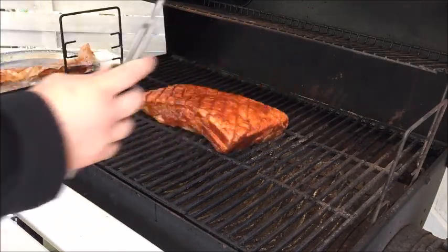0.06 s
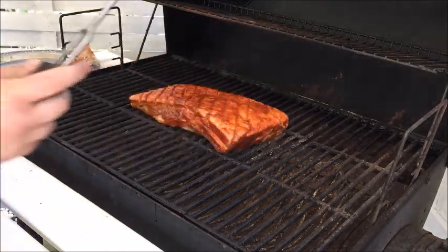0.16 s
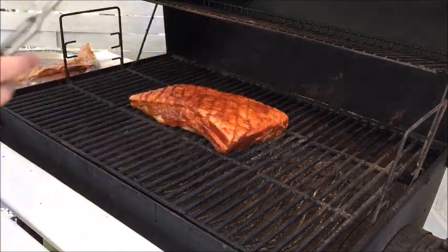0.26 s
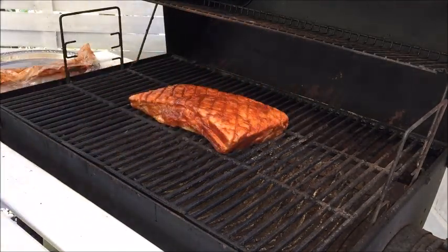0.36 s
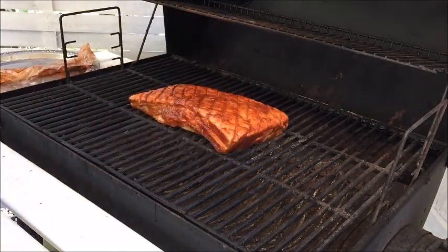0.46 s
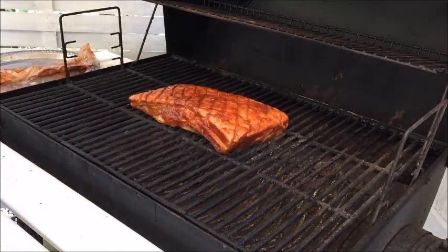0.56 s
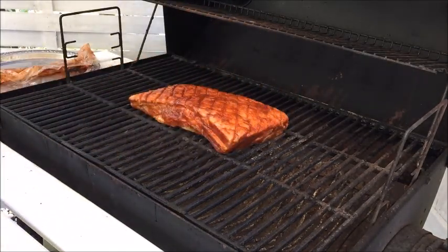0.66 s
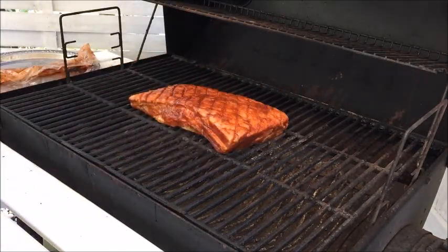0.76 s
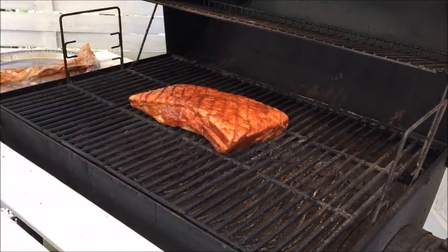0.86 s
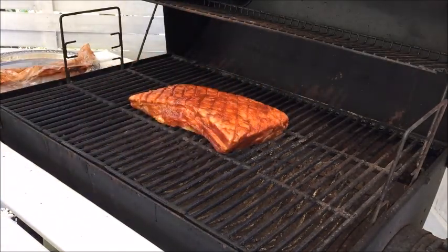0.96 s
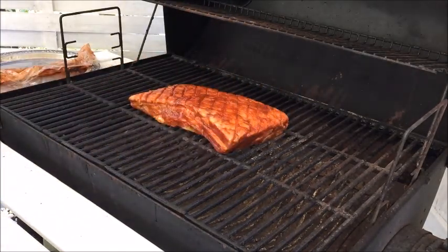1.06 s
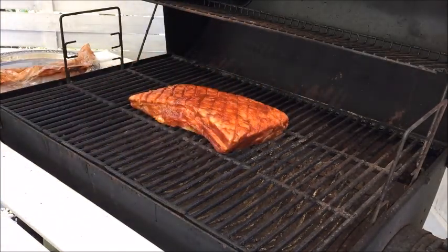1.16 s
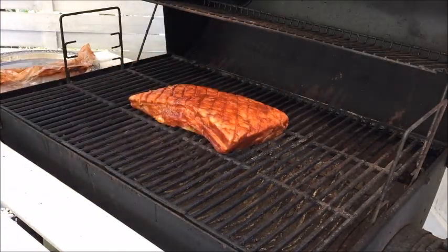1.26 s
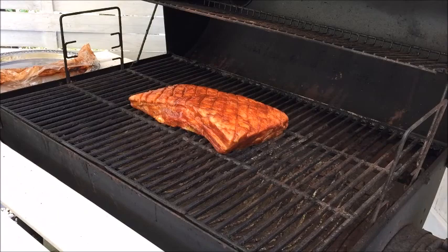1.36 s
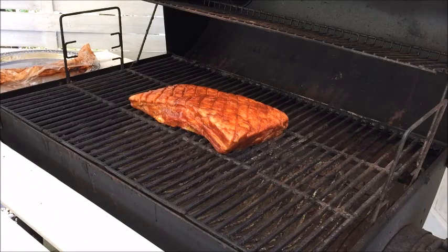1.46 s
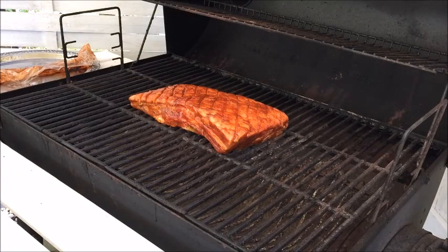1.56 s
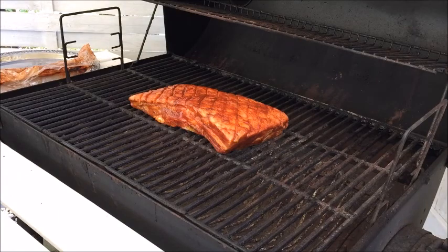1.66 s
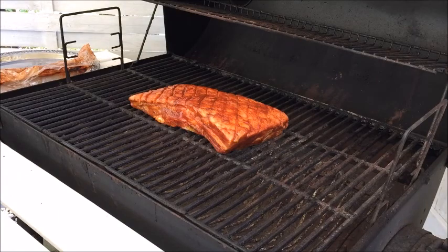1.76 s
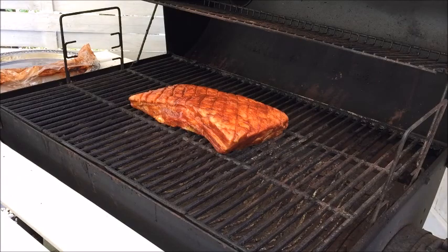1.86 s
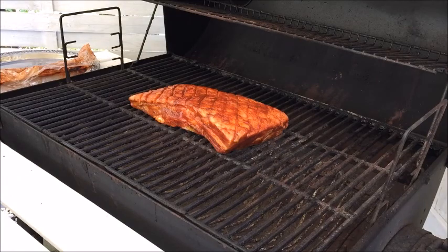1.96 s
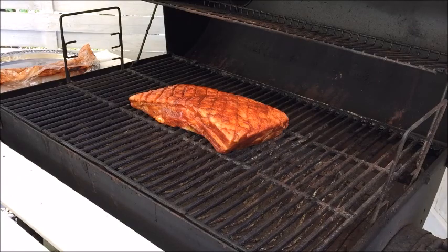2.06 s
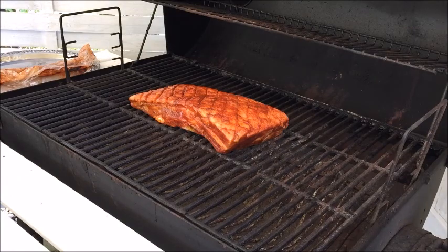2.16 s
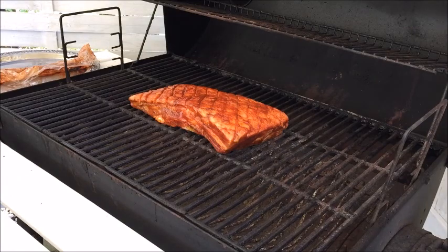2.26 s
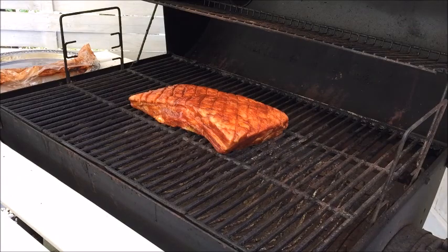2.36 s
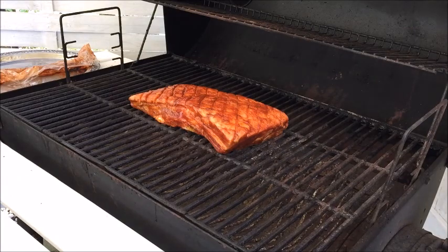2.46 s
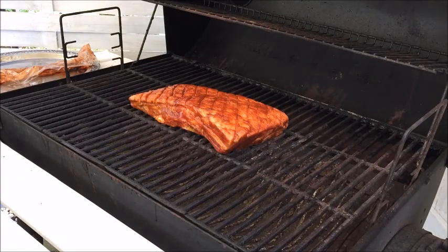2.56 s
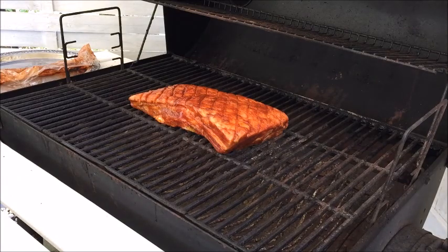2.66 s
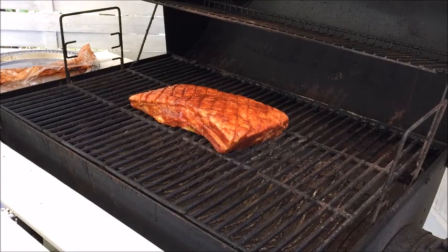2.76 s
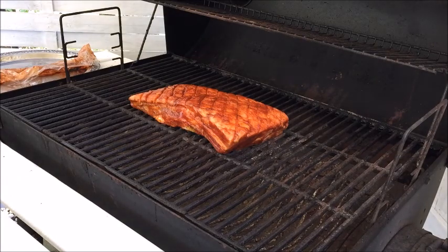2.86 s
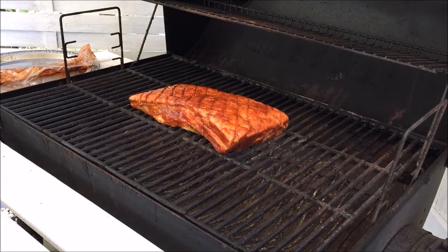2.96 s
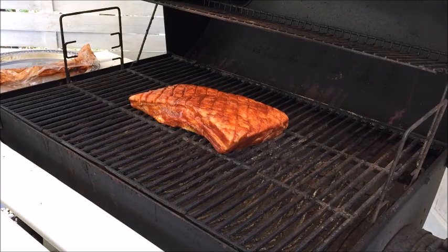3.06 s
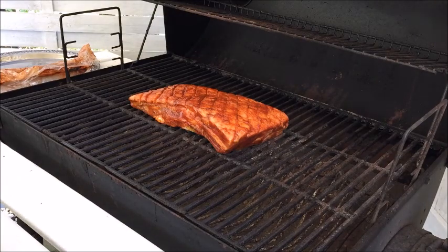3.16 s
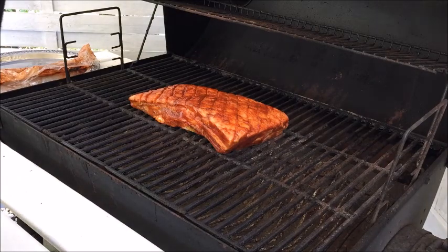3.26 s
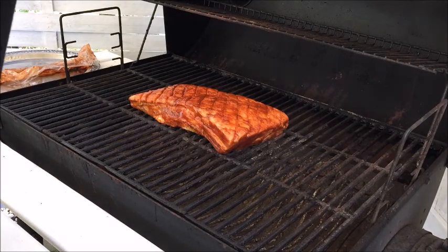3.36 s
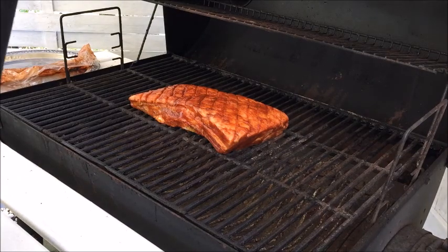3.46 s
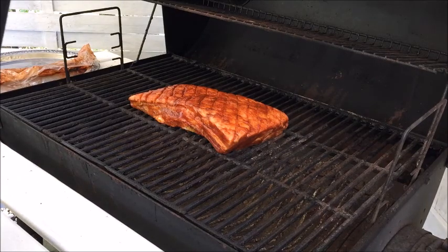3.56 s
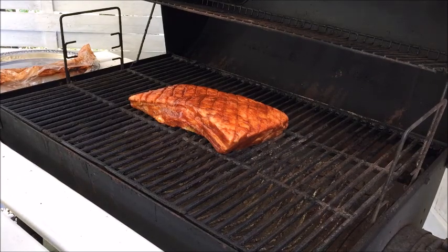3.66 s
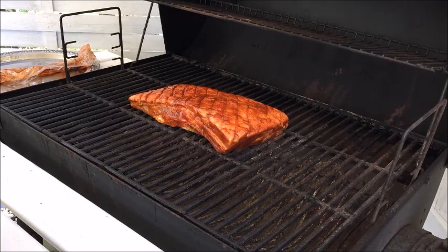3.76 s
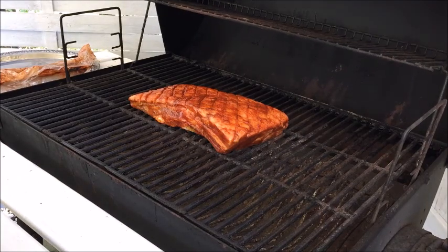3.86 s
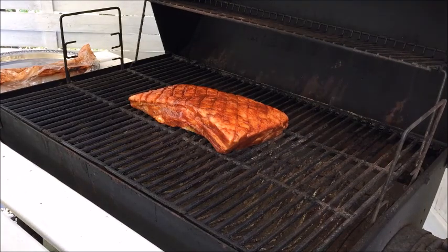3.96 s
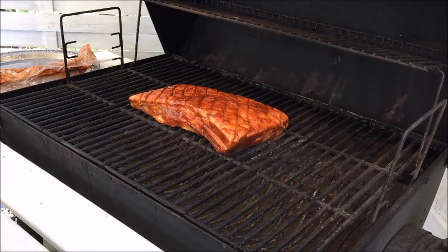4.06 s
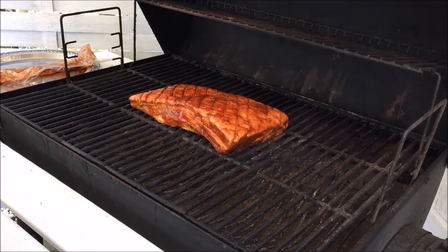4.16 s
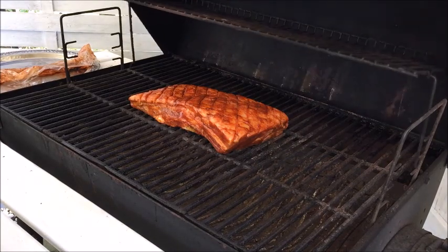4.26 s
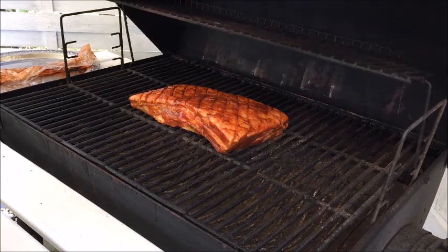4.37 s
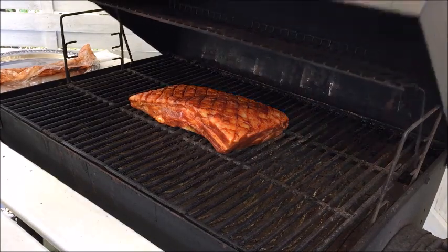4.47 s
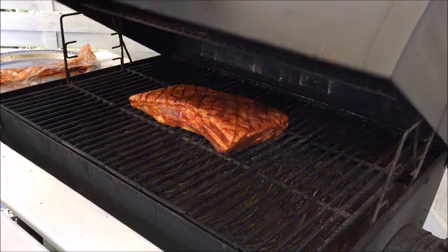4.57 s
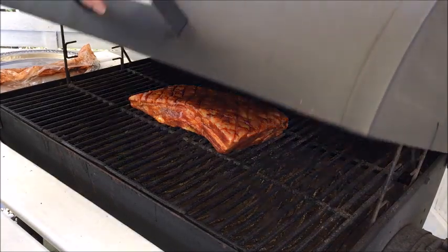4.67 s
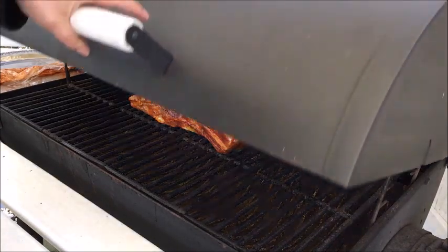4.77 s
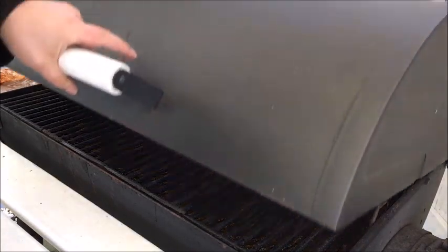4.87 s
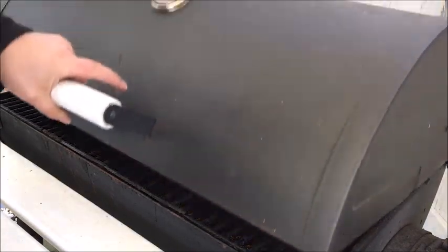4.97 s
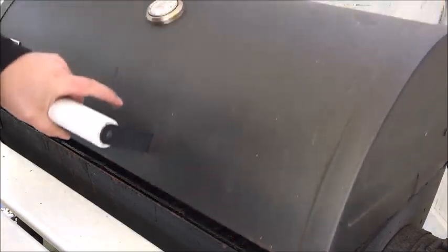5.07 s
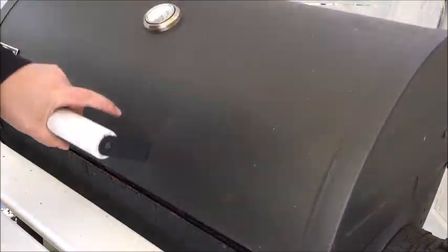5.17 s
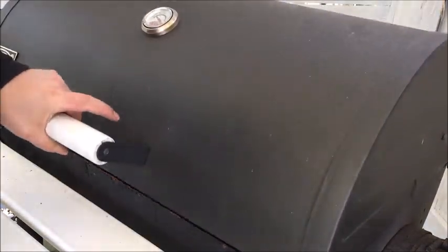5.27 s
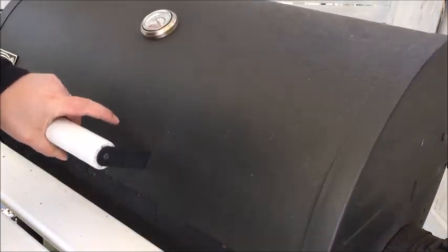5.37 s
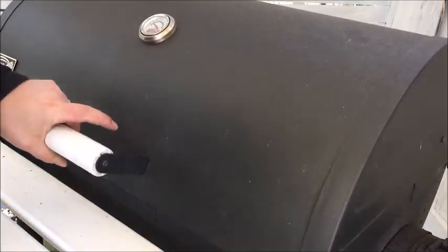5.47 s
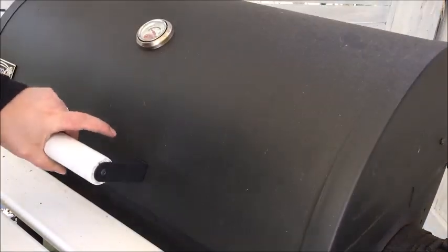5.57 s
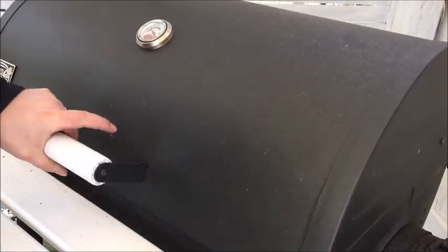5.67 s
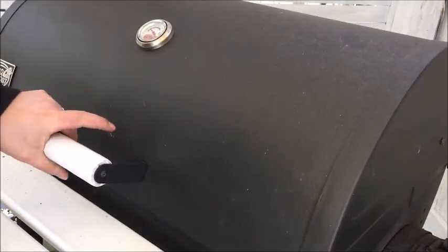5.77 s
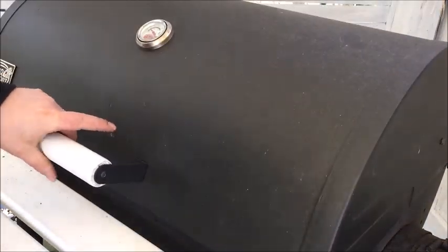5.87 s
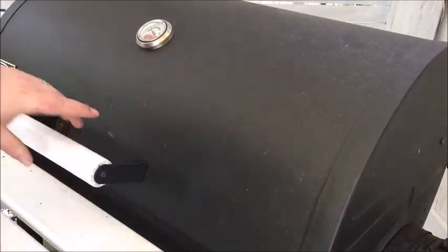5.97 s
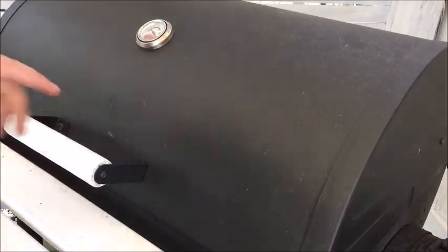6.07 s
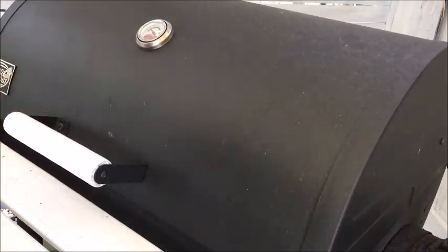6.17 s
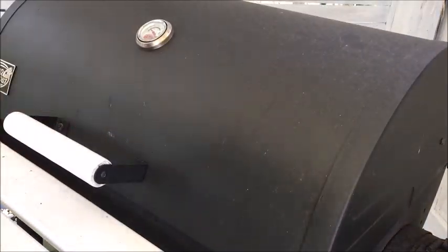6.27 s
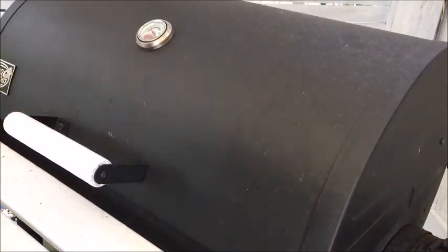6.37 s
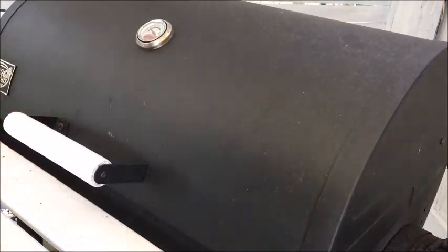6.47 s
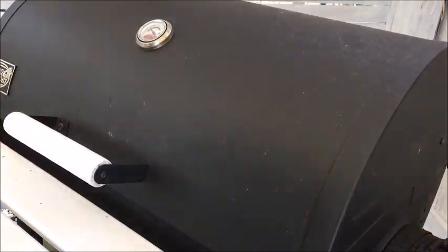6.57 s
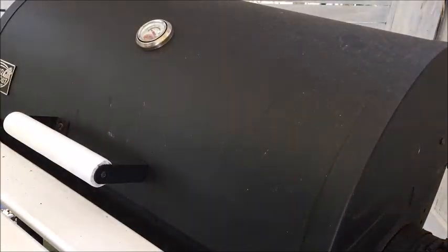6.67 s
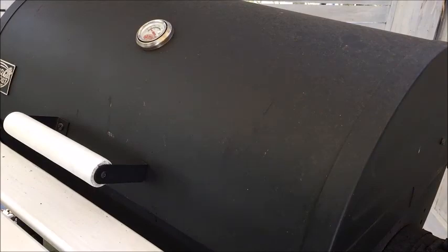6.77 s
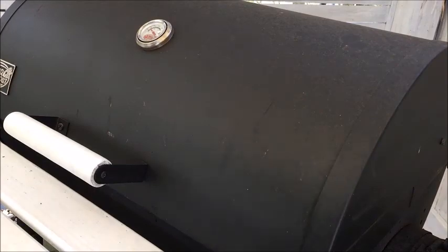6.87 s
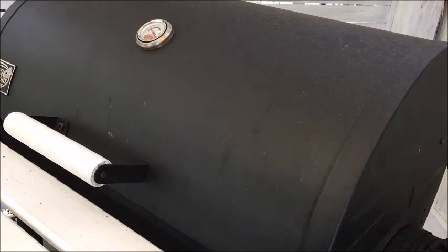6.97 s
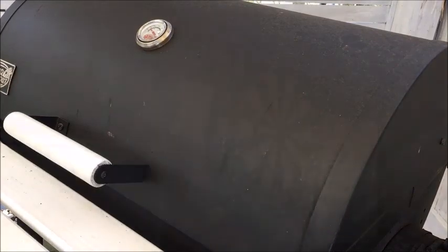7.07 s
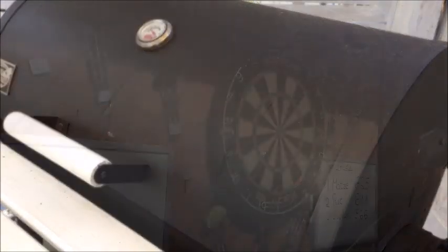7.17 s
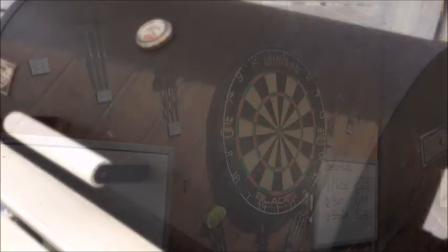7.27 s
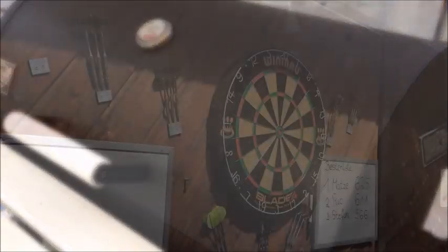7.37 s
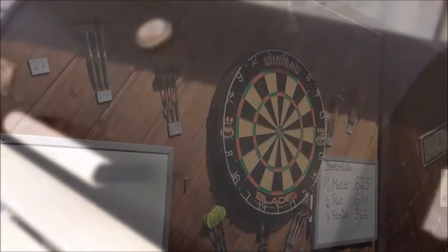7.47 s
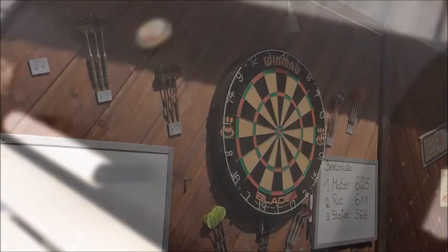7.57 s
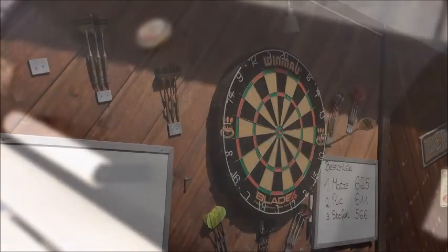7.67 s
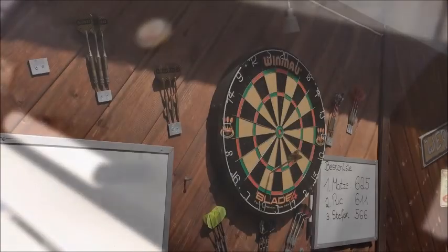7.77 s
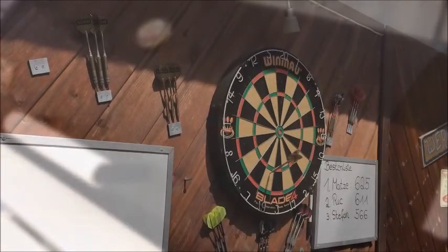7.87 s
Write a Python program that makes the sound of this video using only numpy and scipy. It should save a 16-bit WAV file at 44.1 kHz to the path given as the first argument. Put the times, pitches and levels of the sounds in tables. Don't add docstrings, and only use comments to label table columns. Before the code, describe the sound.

A quiet yard heard on a phone close to a smoker: soft air noise, low lumpy traffic and a wavering fan drone run throughout. Thin sliding bird whistles come near 0.4, 2.5, 4.6 and 7 seconds, with a second two-note bird and short far whistles between. Until about 3 seconds, soft low steps shuffle on decking and tongs tick lightly, with a sharper click at 2.2. Around 3.7 a scuff and a brief ringing clink. From 4.2 the steel lid grinds down on its hinge, groaning and squealing in uneven slips, hardest near 4.9, easing by 5.4. At 5.74 it slams: by far the loudest event, a rapid cluster of heavy thumps, rim cracks and hollow barrel ringing. Bounces and pings follow from 5.83 to 6.5, over a fading hum. Faint touches remain, then low thuds and a click from 7.65 until the end near 7.9.

```python
import sys
import numpy as np
from scipy import signal
from scipy.fft import rfft, irfft, next_fast_len
from scipy.io import wavfile
from scipy.ndimage import uniform_filter1d

SR = 44100
rng = np.random.default_rng(int(sys.argv[2]) if len(sys.argv) > 2 else 0)


def wav_record(signal):
    frames = np.transpose(np.atleast_2d(signal))
    bounded = np.clip(frames, -1, 1)
    quanta = np.round(bounded * 32767).astype(np.int16)
    wavfile.write(sys.argv[1], SR, quanta)


def how_loud(loudness_db):
    steps = np.asarray(loudness_db, float) / 20
    return 10 ** steps


N = 349713


def evened(x):
    return x / np.sqrt(np.mean(x ** 2) + 1e-20)


def read(points, hz):
    f, value = np.transpose(points)
    return np.interp(np.log(hz + 1), np.log(f + 1), value)


def add(mix, s, sound):
    part = mix[round(s * SR):][:len(sound)]
    part += sound[:len(part)]


def seconds(size):
    return np.arange(size) / SR


def decay(t, t60):
    return how_loud(-60 * t / t60)


def shaped(size, gain):
    padded = next_fast_len(size)
    hz = np.fft.rfftfreq(padded, 1 / SR)
    spectrum = rfft(rng.standard_normal(padded)) * gain(hz)
    return evened(irfft(spectrum, padded)[:size])


def bell(hz, centre_hz, octaves):
    return np.exp(-.5 * (np.log2((hz + 1) / centre_hz) / octaves) ** 2)


def slow_noise(size, width):
    return evened(uniform_filter1d(rng.standard_normal(size), width))


def uneven(shape, frames):
    return evened(uniform_filter1d(uniform_filter1d(rng.standard_normal(shape), 3, 0), frames, 1))


def ring(modes, length_s):
    t = seconds(round(length_s * SR))
    return sum(how_loud(db) * decay(t, t60) * np.sin(2 * np.pi * hz * t) for hz, db, t60 in modes)


def fuzzy(hz, fuzz, wobble_s):
    a, b = (slow_noise(len(hz), max(2, round(wobble_s * SR))) for _ in "ab")
    turn = np.exp(2j * np.pi * np.cumsum(hz) / SR)
    return (turn * ((1 - fuzz) * np.sqrt(2) + fuzz * (a + 1j * b))).real


# frequency in Hz, level in dB per Hz.
AIR = [(200, 11), (400, -6.5), (700, 0), (1100, -1), (2000, -4), (3500, -7), (4800, -11), (6500, -12),
       (8500, -14), (10500, -17), (12000, -14.5), (15500, -19.5), (15800, -12.5), (15900, -66.5)]
# time in seconds, level in dB.
RUMBLE = [(0, -64), (1.4, -62.5), (3, -66), (5.4, -61.5), (7.3, -66), (7.93, -56)]
# time in seconds, level in dB.
FAN = [(0, -66.5), (.9, -61), (1.4, -69), (2, -76), (2.45, -65), (3.4, -75), (3.9, -65), (5.5, -70.5),
       (7.93, -72)]


def yard():
    clock = seconds(N)
    rumble_db, fan_db = (np.interp(clock, *np.transpose(c)) for c in (RUMBLE, FAN))
    motor_db = -70.5 + 0.67 * (fan_db - fan_db.mean())
    drift_db = 0.8 * shaped(N, lambda f: 1. * (f < 14))
    out = how_loud(-65.5 + drift_db) * shaped(N, lambda f: how_loud(read(AIR, f)))
    drones = [(rumble_db + 6, 61.6, 0.4, 11.0, 2.4), (fan_db + 2, 210.0, 0.15, 12, 4.25),
              (motor_db, 127, 0.32, 3.7, 3.3), (-78, 302, 0.47, 5.3, 2.5)]
    for db, hz, octaves, lumps_hz, lumps_db in drones:
        lumps = shaped(N, lambda f: 1. * (f < lumps_hz))
        out = out + shaped(N, lambda f: bell(f, hz, octaves)) * how_loud(db + lumps_db * lumps)
    return out


# start in seconds, level in dB, pitch in Hz, t60 in seconds.
STEPS = [(7.649, -31, 52.8, 0.21), (7.783, -33.5, 70, 0.18), (7.902, -25, 89, 0.12)]
# start in seconds, level in dB.
SHUFFLES = [(0.478, -48), (0.83, -38), (1.181, -37), (1.474, -39), (1.977, -39.5), (2.202, -47),
            (3.039, -40.5)]


def steps():
    out, t = np.zeros(N), seconds(12000)
    shuffle_hz, shuffle_t60 = 56, 0.22
    for s, db, hz, t60 in STEPS + [(s, db, shuffle_hz, shuffle_t60) for s, db in SHUFFLES]:
        swell = 1 - np.exp(-t / 0.0044)
        add(out, s, how_loud(db) * decay(t, t60) * swell * np.sin(2 * np.pi * hz * t))
    return out


def whistled(notes):
    out = np.zeros(N)
    for s, length_s, start_hz, end_hz, db in notes:
        size = round(length_s * SR)
        fuzz, wobble_s = (.7, .005) if 3000 < end_hz < 4500 else (.55, .011)
        note = fuzzy(np.linspace(start_hz, end_hz, size), fuzz, wobble_s)
        add(out, s, how_loud(db) * note * signal.windows.tukey(size, .45))
    return out


def echoed(sound):
    echoes = (rng.random(8000) < .03) * rng.standard_normal(8000) * decay(seconds(8000), .2)
    return sound + how_loud(-7) * signal.oaconvolve(sound, echoes / np.linalg.norm(echoes))[:N]


# start in seconds,
# length in seconds, first Hz, last Hz, level in dB.
WHISTLES = [(0.297, 0.057, 4330, 4300, -71), (0.545, 0.042, 3500, 3100, -75),
            (1.96, 0.029, 3300, 3170, -65.5), (2.398, 0.095, 2260, 2200, -58),
            (2.763, 0.037, 3540, 3050, -69), (3.54, 0.12, 2250, 2500, -69), (4.75, 0.065, 2110, 2220, -66),
            (4.82, 0.059, 2240, 2230, -61.5), (6.26, 0.073, 2620, 2150, -64.5),
            (7.268, 0.18, 1870, 1927, -63), (7.543, 0.1, 2713, 2740, -60), (7.593, 0.031, 2788, 2707, -52),
            (7.63, 0.092, 2297, 2290, -55.5), (7.744, 0.034, 2750, 2570, -64.5),
            (.258, 0.018, 8750, 8750, -70), (.258, .02, 10950, 10950, -73), (7.903, 0.029, 2650, 2710, -54)]


def far_birds():
    return whistled(WHISTLES)


# start in seconds, gap in seconds, held note in dB, falling note in dB.
PAIRS = [(0.277, 0.047, -65, -64), (1.776, 0.035, -75, -74), (2.34, 0.047, -77, -75),
         (5.628, 0.049, -62, -63), (6.802, 0.047, -71, -61.5), (7.072, 0.043, -63, -61.5)]


def two_note_bird():
    notes = []
    for s, gap_s, held_db, falling_db in PAIRS:
        notes += [(s, .066, 3770, 3700, held_db), (s + gap_s, .072, 3450, 3150, falling_db)]
    return whistled(notes)


# time in seconds, pitch in Hz, level in dB, fuzz from 0 to 1.
SLIDE = [(0, 7280, -7, 0.7), (.025, 7180, -9.5, 0), (.065, 7090, -4, 0.37), (.078, 6800, -4, .7),
         (0.101, 6170, -19, 0.3)]
# start in seconds, note gap in seconds, level in dB, slide depth, buzz in dB.
PHRASES = [(.44, 0.18, -66, 1.14, -77), (2.47, 0.19, -62.5, 1.7, -74.5), (4.57, 0.188, -55.5, 1.1, -68.5),
           (7.0, .177, -58.5, 0.31, -82)]


def sliding_bird():
    out = np.zeros(N)
    slide_s, *columns = np.transpose(SLIDE)
    t = np.arange(0, slide_s[-1], 1 / SR)
    slide_hz, slide_db, fuzz = (np.interp(t, slide_s, c) for c in columns)
    fuzz = np.clip(fuzz + 0.24, 0, 1)
    for s, gap_s, db, depth, buzz_db in PHRASES:
        for k, note_db in enumerate([-4, -0.5, -2.5]):
            whistle = fuzzy(7150 + depth * (slide_hz - 7150), fuzz, 0.0082)
            add(out, s + k * gap_s, how_loud(db + note_db + slide_db) * whistle * signal.windows.tukey(len(t), .2))
    size = round(0.11 * SR)
    for s, gap_s, db, depth, buzz_db in PHRASES:
        buzz = shaped(size, lambda f: bell(f, 5570, 0.12)) * signal.windows.tukey(size, .5)
        add(out, s + .55, how_loud(buzz_db) * buzz)
    return out


# start in seconds, length in seconds, pitch in Hz, level in dB.
SINGS = [(4.468, 0.035, 2108, -53), (4.47, 0.27, 543, -56.5), (5.09, 0.22, 1775, -66),
         (5.14, 0.085, 1180, -56.5), (5.151, 0.09, 1480, -61), (5.897, 0.036, 5200, -62),
         (6.604, 0.6, 723, -67.5), (6.999, 0.67, 716, -72), (4.26, .09, 1450, -65), (4.4, .04, 1450, -62),
         (4.9, .055, 1180, -57), (4.88, .13, 380, -52.5), (4.72, .05, 1300, -63.5), (4.68, .1, 830, -64.5),
         (4.3, .13, 860, -66.5), (4.48, .06, 1200, -55.5)]


def rubbed_steel():
    return whistled([(s, length_s, hz, hz, db) for s, length_s, hz, db in SINGS])


# start in seconds, level in dB, centre in Hz, t60 in seconds.
CLICKS = [(0.409, -54, 2440, 0.11), (1.036, -63, 9000, .005), (1.203, -60, 8900, 0.086),
          (1.224, -55, 5860, 0.053), (1.239, -53, 6700, 0.02), (1.251, -53.5, 1970, 0.14),
          (1.585, -48.5, 463, 0.13), (1.585, -56.5, 3140, 0.087), (2.085, -57, 2620, 0.037),
          (2.203, -44, 2600, 0.0095), (2.2134, -34.5, 5070, 0.0091), (2.22, -57, 4570, 0.074),
          (2.5495, -50, 11000, 0.014), (2.556, -67, 9000, .08), (3.038, -62, 3020, 0.053),
          (3.18, -63, 1440, 0.22), (3.828, -56, 1200, 0.046), (.394, -59, 8000, 0.082),
          (.413, -52.5, 9500, 0.11), (.66, -66, 8900, 0.049), (6.944, -53, 700, 0.24),
          (6.99, -63, 8000, .06), (7.914, -57, 1800, .088), (1.066, -57.5, 1120, 0.42),
          (7.914, -60, 12000, .02), (7.888, -50, 11000, .04), (7.8925, -38, 2200, 0.028),
          (3.665, -49, 10000, 0.13), (5.835, -56, 7000, .015), (6.045, -65, 11000, .012),
          (5.762, -48, 12000, 0.073)]
# start in seconds, level in dB, centre in Hz, t60 in seconds.
SCUFFS = [(3.319, -67, 5000, 0.2), (3.665, -41, 2760, 0.14), (6.376, -55.5, 3000, 0.21),
          (7.887, -46, 3500, 0.035), (7.896, -31, 300, 0.05)]
# start in seconds, level in dB, centre in Hz, t60 in seconds.
BRUSHES = [(.112, -58.5, 1800, .18), (2.48, -68, 9000, .1), (4.385, -59, 1800, .1),
           (4.463, -53, 1260, 0.074), (4.46, -66, 11000, .1), (7.1, -64, 2900, 1),
           (7.392, -59.5, 5500, .22)]
# start in seconds, level in dB, centre in Hz, t60 in seconds.
PINGS = [(2.169, -56, 1550, 0.21), (2.643, -53.5, 340, 0.11), (3.763, -66, 9300, .056),
         (4.408, -65, 4000, 0.44), (4.909, -59, 1500, 0.06), (5.151, -63, 1340, .18),
         (5.711, -59, 1940, .23), (6.32, -72, 5370, 0.097), (6.421, -65.5, 3000, 0.36),
         (6.965, -55, 1880, 0.036), (7.41, -62.5, 1120, 0.48), (7.756, -61, 6300, 0.079),
         (7.756, -70, 13000, .06), (5.842, -39.5, 2150, 0.17), (5.972, -43.5, 2140, 0.26),
         (6.085, -66, 5600, .1), (6.172, -72, 13000, .07), (4.71, -69, 2700, .25)]
# spread in octaves, rise in seconds.
TOUCH = [
    (1.04, 0.0029),
    (1.68, 0.0044),
    (1.37, 0.026),
    (0.39, 0.0069),
]


def touches():
    out, t = np.zeros(N), seconds(8000)
    for rows, (octaves, rise_s) in zip((CLICKS, SCUFFS, BRUSHES, PINGS), TOUCH):
        for s, db, hz, t60 in rows:
            bands = how_loud(3.5 * slow_noise(4001, 30))
            contact = shaped(8000, lambda f: bands * bell(f, hz, octaves) * np.sqrt(hz / (f + 100)))
            contact *= how_loud(1.9 * slow_noise(8000, 60))
            contact *= np.minimum(t / max(rise_s, .0022), 1) ** 2 * decay(np.maximum(t - rise_s, 0), t60)
            add(out, s, how_loud(db) * contact)
    return out


# frequency in Hz, level in dB, t60 in seconds.
TONGS = [(520, -4.5, 0.35), (820, 4, 0.066), (1055, 3.5, 0.079), (1200, -8, .3), (1380, 3.5, 0.12),
         (1560, -4, .2), (1707, -1.5, 0.2), (2164, -2, 0.28), (2266, 5, .28), (2850, 1, 0.25),
         (3801, -7, .25), (4370, -8, .14), (5840, -8, .12), (6761, -7, 0.06)]
# start in seconds, level in dB, contact in seconds.
ARM_HITS = [
    (3.666, -44.5, 0.02),
    (3.699, -57, 0.019),
    (3.83, -74, 0.019),
]
# frequency in Hz, level in dB, t60 in seconds.
GRATE = [(947, -10, 0.11), (1870, 1, .05), (2160, 1, 0.067), (2530, -2, 0.065), (4650, -2, 0.093),
         (7030, -6, .05)]
# frequency in Hz, level in dB, t60 in seconds.
TIPS = [(1960, -7, .06), (3210, -4, 0.083), (4740, -0.5, 0.082), (6090, -7, 0.081), (7170, -3, .05),
        (8640, -7, .06), (9430, -8, .08)]


def tongs():
    out, t = touches(), seconds(8000)
    for s, db, contact_s in ARM_HITS:
        arms = ring([(hz * arm, mode_db + rng.normal(0, 2.4), min(t60, .2))
                     for hz, mode_db, t60 in TONGS for arm in (1, 1.014)], 0.45)
        scrape = rng.standard_normal(2000) * np.exp(-t[:2000] / contact_s)
        rung = signal.oaconvolve(scrape, arms)
        add(out, s, how_loud(db) * rung / rung[:2000].std())
    for s, db, modes in ((.4135, -48.5, GRATE), (2.2135, -46.5, TIPS)):
        rung = ring(modes, .15)
        add(out, s, how_loud(db) * rung * np.minimum(t[:len(rung)] / .001, 1))
    walls = decay(t, 0.15) * shaped(8000, lambda f: bell(f, 1500, 2.5))
    return out + how_loud(-12.0) * signal.oaconvolve(out, walls / np.linalg.norm(walls))[:N]


# frequency in Hz, width in Hz, level in dB.
LINGER = [(99, 24, 1.5), (189.5, 42, 6.5), (225, 11.9, -13), (287, 23, -9), (354.2, 15.3, 2.5),
          (470.4, 4.3, 6), (539, 8.3, -12), (646, 17, -3.5), (711, 5.9, -1.5), (854, 23, -7),
          (1040, 22, -13.5), (1124, 20, -10.5), (1130, 11, -19.5), (1480, 13, -16), (1650, 25, -35),
          (1903, 29, -12.5), (2150, 58, -11.5), (2414, 27, -14.5), (2900, 40, -24)]


def clusters(hz):
    return sum(how_loud(db) / (1 + (2 * (hz - f) / width) ** 2) for f, width, db in LINGER)


def patchy(x, depth_db):
    hz, t, z = signal.stft(x, SR, nperseg=1024)
    return signal.istft(z * how_loud(depth_db * uneven(z.shape, 7)), SR, nperseg=1024)[1][:len(x)]


# frequency in Hz, level in dB per Hz.
RUB = [(70, -34.5), (120, 1), (185, 4.5), (250, -2.5), (380, -5), (550, -12.5), (800, -15), (1200, -15),
       (2500, -28), (5000, -69)]
# time in seconds, effort in dB.
SWING = [
    (4.2, -64),
    (4.38, -54.5),
    (4.64, -52.5),
    (4.85, -45),
    (5.1, -49.5),
    (5.37, -59),
    (5.46, -81),
]
# time in seconds, jolt in dB, grit in dB.
CATCHES = [(3.75, -70, -59), (3.87, -57, -82), (4.288, -55.5, -83), (4.493, -57, -51),
           (4.916, -40.5, -53.5), (5.168, -47.5, -58.5)]


def hinge():
    clock, t = seconds(N), seconds(8000)
    s, jolt_db, catch_db = np.transpose(CATCHES)[:, :, None]
    jolts_db = (jolt_db - 112.5 * abs(clock - s)).max(0)
    effort_db = np.maximum(np.interp(clock, *np.transpose(SWING), -120, -120), jolts_db)
    grit_db = (catch_db - 179 * np.maximum(clock - s, 2.3 * (s - clock))).max(0)
    slips = (rng.random((2, N)) < 500 / SR) * rng.standard_normal((2, N))
    slips *= how_loud(3.27 * rng.exponential(1, (2, N)))
    fade = decay(t, .15) * (1 - np.exp(-np.arange(8000) / 150)) ** 2
    out = how_loud(effort_db - 11.5) * shaped(N, lambda f: bell(f, 310, 0.26))
    colours = (lambda f: how_loud(read(RUB, f))), (lambda f: bell(f, 1220, 0.54))
    for train, db, colour in zip(slips, (effort_db, grit_db), colours):
        shaken = evened(signal.oaconvolve(train, fade * shaped(8000, colour))[:N])
        hummed = shaped(N, lambda f: colour(f) * (0.034 + clusters(f) * np.sqrt(f / 200)))
        out = out + evened(patchy(shaken + 1.26 * hummed, 4.06)) * how_loud(db)
    return out


# frequency in Hz, level in dB, t60 in seconds.
DRUM = [(109.6, 1, 0.254), (194, -5, 0.14), (295.7, 3.5, 0.26), (305, -18, 0.54), (409, -18, 2.8),
        (448, -23.5, 0.47), (612, -18, 0.98), (657, -39.5, 5.0), (700, -12.5, 0.06), (712, -31, 0.23),
        (859, -3.5, 0.15), (897, -8, 0.3), (1057, -4.5, 0.2), (1237, -17, 1.5), (1250, -18.5, 0.47),
        (1278, -34.5, 0.46)]
# frequency in Hz, level in dB per Hz.
SHEET = [(50, -48), (100, -8.5), (150, -1), (210, 5.5), (300, -10.5), (380, -6), (470, -1), (800, -7),
         (1500, -9.5), (2800, -14.5), (3600, -29), (5500, -37), (10000, -63.5)]
# frequency in Hz, t60 in seconds.
SHEET_T60 = [(80, .4), (250, .28), (700, .36), (1500, .42), (3000, .26), (4500, .24), (10000, .07)]


def barrel():
    hz, t, z = signal.stft(rng.standard_normal(SR), SR, nperseg=256)
    clumps_db = 2.7 * uneven(z.shape, 10)
    fade_db = -60 * t / read(SHEET_T60, hz)[:, None]
    wash = signal.istft(z * how_loud(clumps_db + fade_db), SR, nperseg=256)[1][:SR]
    bins = np.fft.rfftfreq(2 * SR, 1 / SR)
    crowded = 1.0 + (bins > 3100)
    crowded = crowded + sum(1 / (1 + ((bins - f) / (width + 12)) ** 2) for f, width, db in LINGER)
    sheet = irfft(rfft(wash, 2 * SR) * how_loud(read(SHEET, bins)) * crowded)[:SR]
    after = seconds(SR)
    sheet *= 1 - np.exp(-after / 0.00083)
    linger = shaped(SR, clusters) * decay(after, 1.05) * (1 - np.exp(-after / 0.0035))
    clear = ring([(f * rng.uniform(1.0, 1.01), db + rng.normal(0, 1.0), min(t60, 1.2))
                  for f, db, t60 in DRUM], 1)
    head = round(0.0053 * SR)
    sheet = how_loud(-2.5) * sheet / sheet[:head].std()
    clear = how_loud(-5.0) * clear / clear[:head].std()
    return sheet + clear + how_loud(-8) * linger


# start in seconds, air thump in dB, thump pitch in Hz,
# drum ring in dB, edge crack in dB.
SLAM = [
    (4.288, -33.5, 172, -59, -75),
    (5.7395, -26, 263.6, -33.5, -61),
    (5.7439, -4.5, 250, -25, -58),
    (5.7487, -17, 309, -24.5, -42),
    (5.753, -3.5, 223, -25, -44),
    (5.7618, -10, 130, -37, -41.5),
    (5.7708, -6.5, 162.4, -44, -47.5),
    (5.7807, -20, 252.8, -37, -61),
]
# start in seconds, drum ring in dB, edge crack in dB.
BOUNCES = [(4.468, -52, -60), (4.491, -47.5, -74), (5.834, -38.5, -49), (5.89, -41.5, -61),
           (5.969, -36, -64), (6.045, -65, -70), (6.127, -48, -58), (6.165, -46.5, -73),
           (6.318, -54.5, -61.5), (6.377, -49.5, -66), (6.462, -57.5, -64.5)]
# centre in Hz, width in octaves, level in dB, t60 in seconds.
BOOM = [
    (65, 0.31, -49.5, 1),
    (190, .4, -45, 1),
    (388, 0.31, -57.5, 4.8),
    (1120, 0.06, -51, 2),
]
# frequency in Hz, level in dB, t60 in seconds.
THIN_TONES = [(2850, -1, 0.45), (3117, 13, 0.16), (4100, 10, 0.15), (5740, 8, 0.17), (6050, 10.5, 0.16),
              (7450, 8, 0.15), (8250, 6, 0.2), (8950, -2, 0.1)]
# start in seconds, level in dB.
FLICKERS = [(6.141, -68)]


def lid():
    force, out = np.zeros((4, N)), np.zeros(N)
    t, after = np.arange(-300, 300) / SR, seconds(6000)
    crack_fade = (1 - np.exp(-after / 0.0018)) * decay(after, 0.11)
    bounces = [(s, db - 5, 200, db, crack_db) for s, db, crack_db in BOUNCES]
    for k, (s, thump_db, thump_hz, ring_db, crack_db) in enumerate(SLAM + bounces):
        force[k % 4, round(s * SR)] = how_loud(ring_db)
        push = np.cos(2 * np.pi * thump_hz * t) * np.exp(-.5 * (t * thump_hz / 0.27) ** 2)
        push = push - 2 * push.mean() * np.hanning(600)
        add(out, s - 300 / SR, how_loud(thump_db) * push)
        octaves = .95 if k < len(SLAM) else .6
        add(out, s, how_loud(crack_db) * crack_fade * shaped(6000, lambda hz: bell(hz, 4640, octaves)))
    slam_s = 5.76
    since = seconds(N) - slam_s
    chatter = (rng.random((4, N)) < 15 / SR) * rng.standard_normal((4, N)) * (since > 0)
    force += chatter * how_loud(-58.0 - 43.0 * np.maximum(since, 0))
    for hz, octaves, db, t60 in BOOM:
        boom = shaped(2 * SR, lambda f: bell(f, hz, octaves)) * decay(seconds(2 * SR), t60)
        add(out, slam_s, how_loud(db) * boom)
    for s, db in FLICKERS:
        flicker = ring(THIN_TONES, 0.026)
        add(out, s, how_loud(db) * flicker * signal.windows.tukey(len(flicker), .3))
    return out + sum(signal.oaconvolve(spot, barrel())[:N] for spot in force)


def scene():
    smoker = lid() + hinge() + tongs()
    whistles = echoed(sliding_bird() + far_birds() + rubbed_steel() + two_note_bird())
    return (smoker + whistles + steps() + yard())[None]


DROPS = [.052, .478, 1.118, 1.289, 1.459, 1.78, 1.886, 2.035, 2.782, 3.742, 4.808, 5.363, 5.92, 6.152, 6.45,
         6.51, 7.091]


def thinned(sound):
    hz, t, z = signal.stft(sound, SR, nperseg=512, noverlap=384)
    survive = rng.random((len(DROPS), 80)) < .25
    for s, kept in zip(DROPS, survive):
        hit = (hz > 2200) & ~kept[(hz / 300).astype(int)]
        z = z * how_loud(-18 * hit[:, None] * np.exp(-.5 * ((t - s) / 0.0042) ** 4))
    return signal.istft(z, SR, nperseg=512, noverlap=384)[1][:, :N]


def roll_off(x):
    return signal.sosfilt(signal.butter(12, 16480, fs=SR, output="sos"), x)


def record(dry):
    heard = signal.sosfilt(signal.butter(2, 55, "high", fs=SR, output="sos"), dry)
    heard = signal.sosfilt(signal.ellip(8, .5, 70, 16300, fs=SR, output="sos"), thinned(heard))
    return roll_off(heard)


dry = scene()
out = record(dry)
wav_record(out)
```